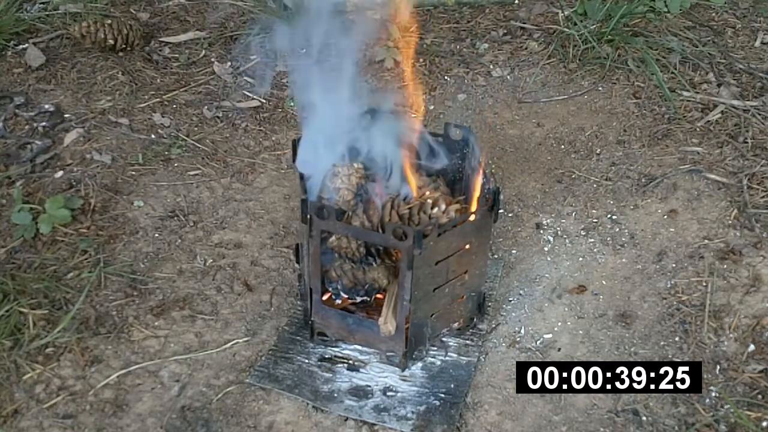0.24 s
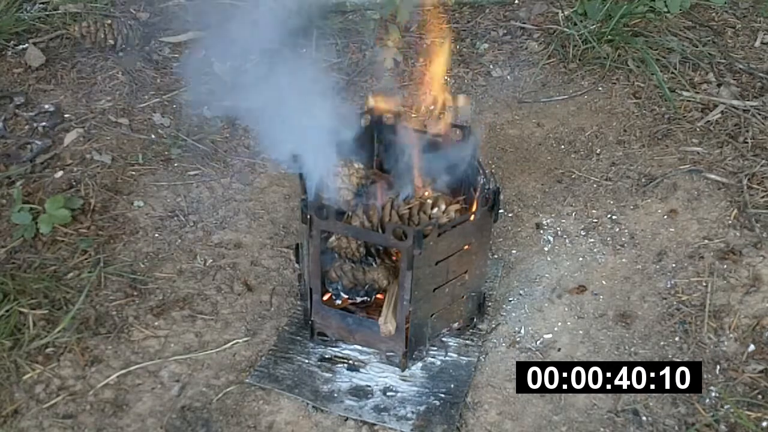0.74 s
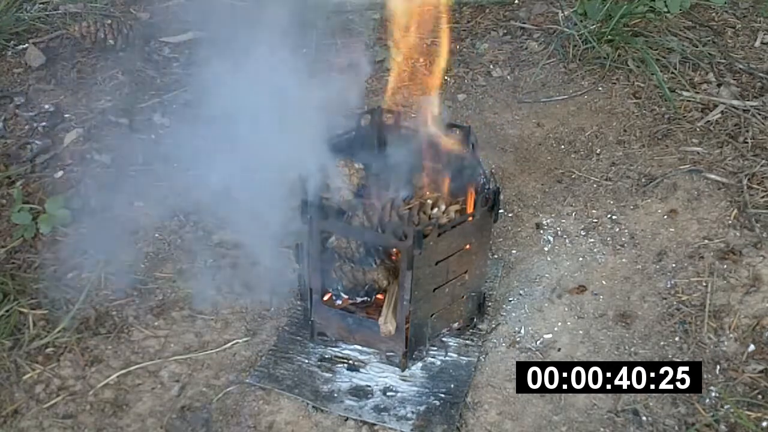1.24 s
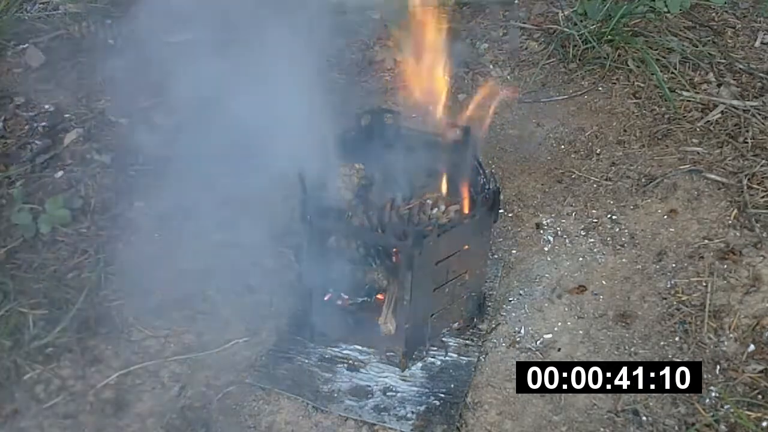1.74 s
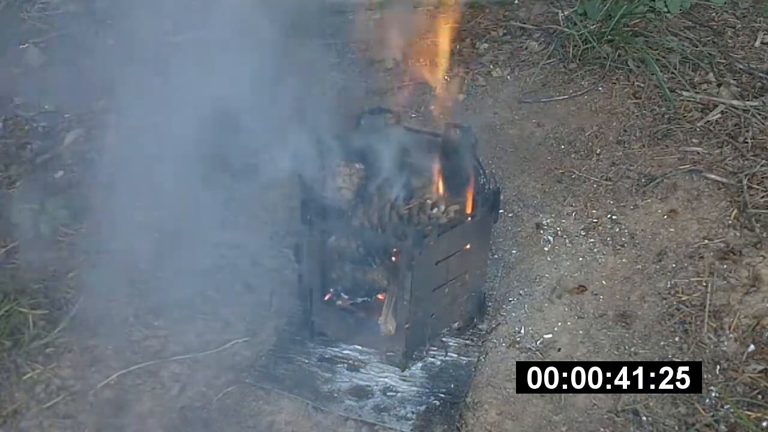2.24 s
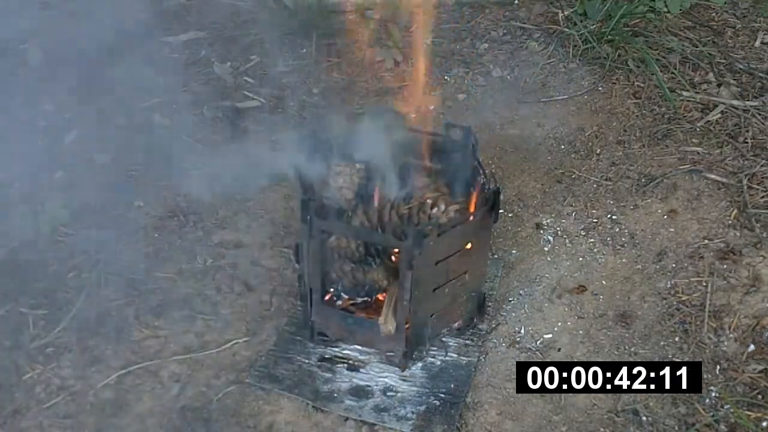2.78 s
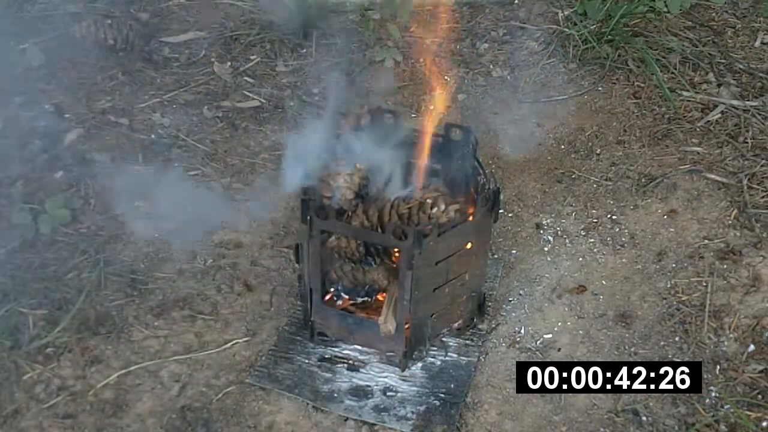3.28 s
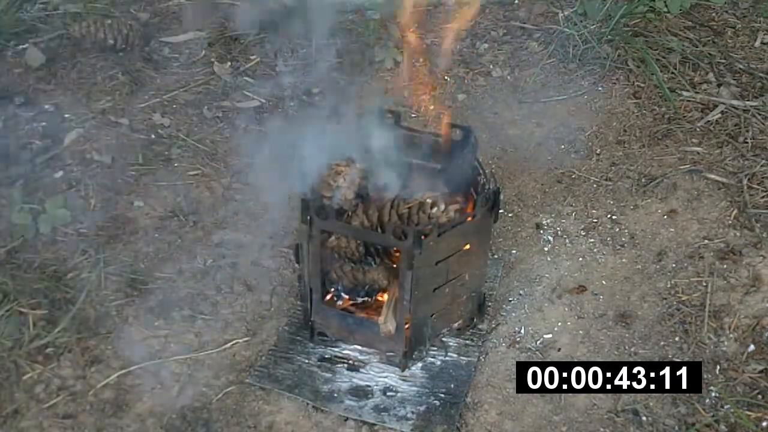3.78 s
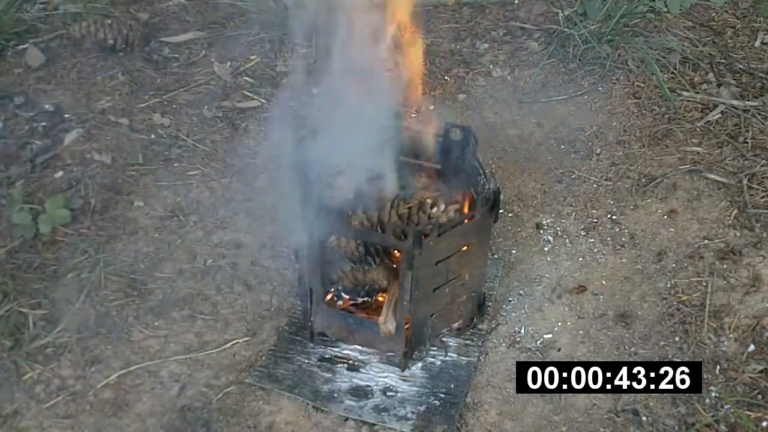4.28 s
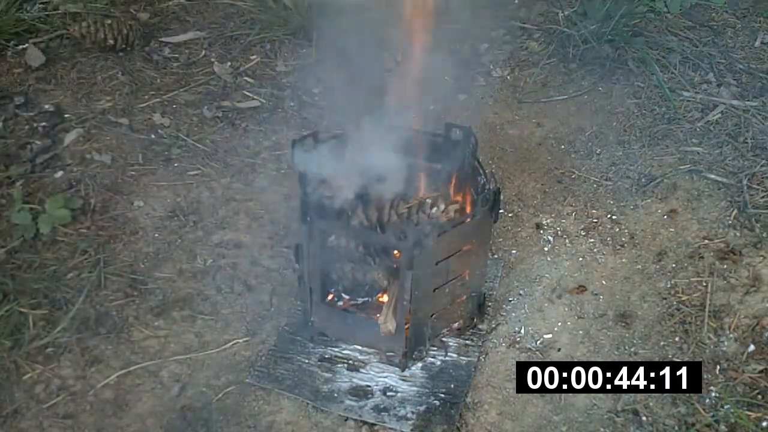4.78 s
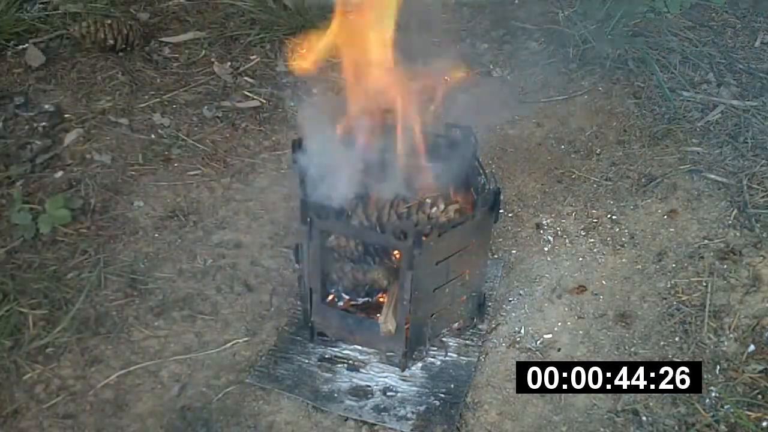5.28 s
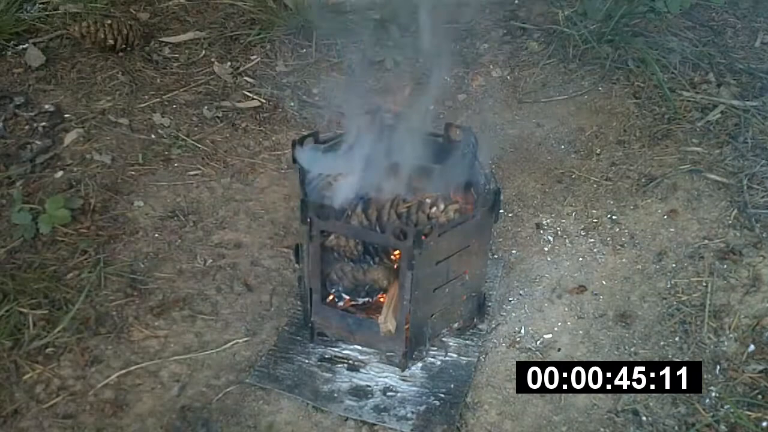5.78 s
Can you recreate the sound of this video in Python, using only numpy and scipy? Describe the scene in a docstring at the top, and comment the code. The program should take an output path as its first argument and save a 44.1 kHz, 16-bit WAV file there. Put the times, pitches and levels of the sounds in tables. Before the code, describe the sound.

A small fire of pine cones and sticks burns in a metal stove outdoors, heard close, dry and in mono. From 0 to 1.3 seconds there is fine, irregular crackle with modest ticks, over soft low flame flutter and faint hiss. Stronger snaps come at 1.4 and 1.5, then a very loud, hard crack at 1.8. Between 2 and 3, small pops cluster among low, blunt puffs of igniting gas. The loudest crack hits at 3.3, followed by a busy patter and another bright, sharp pop at 3.8. Medium cracks follow at 4.2, 4.8 and 4.9; a brief hiss swells near 5. After a sparser moment, a big double snap lands at 5.5. Hiss rises unevenly towards 6 as crackling continues. Tiny far bird chips near 0, 3.5, 3.8 and 4.9, a faint low wavering hum and thin steady high whines stay almost hidden.

```python
"""Dry pops over fine crackle, gas hiss and low flame puffs: pine cones and sticks burn in a small metal stove.
Resin pockets burst as impulses exciting resonances; igniting gas gives pressure humps and rumble; hiss, fizz
and draught are coloured noise of wavering level. Outdoors, a far bird chips in arched sine sweeps and a low
sine hum wavers. The microphone path adds faint whines, four notches and a band limit; above 5 kHz the whole
sound steps down."""
import sys
import numpy as np
from scipy.fft import rfft, irfft, next_fast_len
from scipy.io import wavfile
from scipy.ndimage import uniform_filter1d, map_coordinates

SR = 44100
rng = np.random.default_rng(int(sys.argv[2]) if len(sys.argv) > 2 else 0)


def output_pcm(signal):
    """Save a mono or channel-first signal as 16-bit PCM at the path in sys.argv[1].

    Samples are clipped to [-1, 1] before scaling.
    """
    pcm = np.clip(np.atleast_2d(signal).T, -1, 1) * 32767
    wavfile.write(sys.argv[1], SR, np.round(pcm).astype(np.int16))


N = 265923

# Low hum: t/s, f/Hz, rms level/dB (both waver about these values)
HUM_TRACK = [(0, 90.75, -62), (1, 92, -67.5), (1.5, 93, -63.5), (2.3, 92.2, -67.5), (2.7, 91.4, -58),
             (3.1, 90.2, -69.5), (3.5, 89.9, -76), (6.03, 89.6, -73)]
# Arched bird chips: t of the top/s, top f/Hz, drop at both ends/Hz, length/s, peak level/dB
BIRD_CHIPS = [(0.039, 3990, 900, 0.032, -62), (.255, 3950, 800, 0.025, -68), (3.543, 3760, 300, 0.025, -64),
              (3.77, 3950, 300, 0.022, -63), (4.883, 3850, 304, 0.024, -68)]
# Mean course of the hiss of escaping gas: t/s, rms level/dB
HISS_LEVEL = [(0, -68.5), (1.0, -70), (1.68, -70), (2.2, -70.5), (2.48, -68), (3.1, -72), (3.7, -68),
              (4.1, -70), (4.8, -67.5), (4.98, -59), (5.1, -67), (5.3, -64.5), (5.55, -63.5), (5.65, -64.5),
              (5.8, -58.5), (5.9, -66), (6.03, -56)]
# Spectrum of the hiss: f/Hz, relative level/dB
HISS_SPECTRUM = [(500, -55), (1200, -18), (2000, -10.5), (2800, -10.5), (3600, -2.5), (4800, -2.5),
                 (5300, -3), (6200, -6), (7500, -14), (9500, -26)]
# Spectrum of the fizz: f/Hz, relative level/dB
FIZZ_SPECTRUM = [(5000, -30), (7000, -6.5), (9500, -7.5), (12500, -6), (15000, -5.5), (15250, -13),
                 (15400, -53)]
# Spectrum of the broad roar: f/Hz, relative level/dB
ROAR_SPECTRUM = [(150, -9.5), (400, -2.5), (1000, -6), (2200, -12.5), (3200, -26.5), (4500, -38)]
# Mean course of the flame flutter: t/s, gain/dB
FLUTTER_LEVEL = [(0, -56.5), (.25, -55.5), (.55, -57.5), (.65, -52.5), (.92, -55), (1.3, -55.5), (1.8, -55),
                 (2.7, -54.5), (3.0, -55), (3.2, -57.5), (3.29, -52), (3.65, -55.5), (3.9, -52.5),
                 (4.2, -56), (4.4, -55.5), (4.75, -54), (5.0, -53.5), (5.6, -53), (5.74, -51),
                 (5.89, -53.5), (6.03, -52)]
# Spectrum of the flame rumble: f/Hz, relative level/dB
RUMBLE_SPECTRUM = [(8.8, -41), (15, 4), (38, -1.5), (91, -2.5), (238, -12), (324, -20), (700, -32.5),
                   (910, -61), (1540, -120)]
# Strongest flame puffs: t/s, peak level before the high-pass/dB, width at half height/ms
STRONG_PUFFS = [(.01, -40.5, 7.8), (0.409, -43, 5.3), (.7647, -38.5, 3.2), (0.86, -39, 7.3),
                (.964, -36, 4.6), (1.3009, -44, 4.2), (1.5582, -39, 4.5), (1.571, -42, 3.2),
                (1.6899, -36.5, 2.4), (1.9427, -40, 4.5), (2.0135, -36.5, 4.8), (2.105, -43, 2.7),
                (2.197, -37.5, 7.1), (2.2733, -39, 4), (2.2906, -38.5, 1.8), (2.3632, -42.5, 1.5),
                (2.4668, -35.5, 12), (2.4843, -37.5, 2.7), (2.5577, -44, 3.4), (2.589, -42, 2.5),
                (2.717, -38, 4.2), (2.7738, -44, 3.5), (2.8652, -41, 3.1), (2.914, -37, 2.1),
                (3.2731, -37.5, 3.2), (3.294, -35, 1.9), (3.333, -41, 2.6), (3.4389, -40, 2.1),
                (3.453, -40, 3.5), (3.5477, -37, 1.9), (3.747, -38.5, 4), (3.8034, -43.5, 2.1),
                (3.8285, -39.5, 3.2), (3.8677, -41, 1.6), (3.886, -37.5, 1.8), (4.0598, -38, 1.76),
                (4.251, -39, 2.7), (4.315, -40.5, 1.4), (4.8244, -41, 6.5), (5.068, -35.5, 1.65),
                (5.356, -40.5, 7.3), (5.742, -38, 2.5), (5.7693, -37.5, 2.2)]
# Bursting pockets placed one by one, the loud ones and some small: t/s, snap energy level/dB, snap f/Hz, body
# level re snap/dB, brightness re snap/dB
PLACED_POPS = [(.0398, -37.5, 4120, -21, -7), (.0967, -41, 4270, -14, 3.5), (.1855, -33, 3900, -31, -8),
               (.2161, -44, 4490, -12, -8), (.2586, -38, 4400, -12, -13), (.2846, -42, 4310, -12, -2),
               (.3257, -28, 4300, -11, 4), (.3334, -36, 4420, -18, -13), (.3577, -44, 4210, -10, 5),
               (.4498, -36.5, 4200, -11, -11), (.5375, -23.5, 4000, -12.5, -12), (.5669, -46, 4560, -12, 2.5),
               (.6211, -35.3, 4420, -9, -1), (.637, -33, 4390, -15, -8), (.687, -25, 4000, -14.5, -2.5),
               (.8596, -35, 4480, -20, -12), (.8684, -37, 4300, -17, -8), (.8917, -28.5, 4200, -17, -11),
               (.9008, -35, 4120, -14, -11), (.9976, -37, 4000, -7, -17), (1.0666, -40.5, 4300, -1, -24),
               (1.269, -25.5, 4230, -27, -5), (1.362, -13, 4500, -15, -10.5), (1.481, -33, 4300, -24, -8),
               (1.4947, -33.7, 4540, -14, -15), (1.5062, -9.5, 4150, -16, -5), (1.5108, -39, 3800, 1, -7),
               (1.5733, -26.5, 4200, -12.5, -34), (1.6423, -19, 4340, -16.5, -8.5),
               (1.6744, -32.5, 4506, -18, -6), (1.718, -30.5, 4360, -23, -28), (1.761, -31, 4170, -16, -3),
               (1.781, 3.5, 4360, -16.5, -8), (2.0106, -32, 4360, -26, -2.5), (2.0644, -35, 4030, -13, -5),
               (2.084, -26, 4400, -15, -8.5), (2.1405, -37, 4550, -16, -2), (2.1582, -25.5, 4730, -15, -11),
               (2.1656, -35, 4190, -20, -12), (2.1855, -36, 4360, -15, -4), (2.2684, -29.5, 4070, -15, -16),
               (2.2886, -40, 4230, 2.2, -11), (2.2958, -36.5, 4320, -4, -12), (2.3585, -30, 4430, -21, -14),
               (2.3982, -33, 4460, -22.6, -1), (2.4161, -34, 4060, -9, -3), (2.4224, -40, 4370, -5, -7),
               (2.4511, -36, 4420, -11, 1), (2.5267, -28.5, 4030, -12, -1.5), (2.5657, -37, 4190, -14, -5),
               (2.5924, -29.5, 4480, -19, -8), (2.6131, -28.5, 4550, -17, -5), (2.6362, -27, 4150, -15, -5.5),
               (2.8921, -35, 4224, -20, 3.5), (2.9147, -37, 4200, -17, -8), (2.9595, -35, 4340, -18, -5),
               (2.9807, -19, 4370, -18.5, -14), (3.1288, -31.1, 4070, -11, -14),
               (3.1622, -36.5, 4400, -15, -7), (3.2111, -37.5, 4550, -14, -8), (3.25, -33, 4220, -17, -6),
               (3.2641, -28, 4660, -12, -6), (3.2754, -32, 4530, -19, -6), (3.2953, -18.5, 4710, -17, -9),
               (3.313, 5, 4460, -17.5, -12), (3.3374, -31, 4260, -20, -8), (3.5006, -30.5, 4300, -11, -4),
               (3.5757, -32, 4560, -15, -7), (3.6144, -36.5, 3890, -19, 5), (3.6292, -24.5, 4390, -20, -14),
               (3.6542, -20.5, 4300, -19, -11), (3.659, -32, 4150, -21, -11), (3.6775, -28, 4590, -16, -4),
               (3.7123, -18.5, 4340, -18, -9), (3.7398, -36.5, 4280, -16, -6), (3.8308, -3, 5230, -22, -7),
               (3.9327, -37.5, 4430, -5, -3), (3.9734, -30, 3670, -8.5, -8), (4.0169, -37, 4540, -7, -6),
               (4.0539, -39, 4160, -19, -3), (4.067, -48, 4610, -10, 9), (4.115, -34, 4150, -18, -1),
               (4.1855, -28, 4360, -17, -12), (4.2227, -12, 4190, -7.5, -16), (4.3045, -37, 4730, -8, -23),
               (4.3511, -38.5, 4630, -18, 1), (4.4698, -36.5, 3820, -5, -12), (4.5703, -30, 4300, -10, -9),
               (4.6427, -26.5, 4610, -23, -3.5), (4.7151, -27.5, 4050, -9, -32), (4.7596, -35, 4330, -15, -3),
               (4.7829, -15, 4300, -15.5, -8), (4.7885, -35, 4440, -4, -7), (4.8007, -14.5, 4400, -13, 2.5),
               (4.8263, -28, 4160, -14, -5), (4.866, -38, 4330, -11, 0), (4.937, -12.5, 4240, -13.5, -7.5),
               (4.9633, -39, 4080, -3, 6), (5.0393, -33, 4130, -19, -1), (5.0586, -23.5, 4370, -19, -6),
               (5.3111, -34.5, 4210, -6, -10), (5.3357, -35.5, 4440, -15, -30),
               (5.3568, -31.4, 4450, -16, -2.5), (5.4702, -29.5, 4680, -20, -9), (5.496, 1, 4050, -14, -3),
               (5.5204, -9.7, 4290, -13.5, -1), (5.5302, -33, 4020, -16, -5), (5.5905, -32.5, 4410, -13, -6),
               (5.6254, -21.5, 4360, -20, -7), (5.7112, -37, 4590, -5, -4), (5.7443, -21.5, 4550, -16.5, -7),
               (5.8707, -43, 4140, 3, 6.5), (5.9189, -19, 4530, -15, -18), (5.931, -36, 4540, -9, -3),
               (5.9769, -32, 4100, -22, -3)]
# Lower and upper limits of the random faint crackle, in the same five columns
FAINT_MIN = [0, -52.5, 3895, -17, -21]
FAINT_MAX = [6.5, -41, 4796, -3.5, -7]
# Resonance pairs above the snap (edge, air, top): first f/Hz, width/Hz, second f/Hz, width/Hz,
# level re snap at zero brightness and 0 dB snap/dB, slope with brightness/(dB/dB), slope with snap energy/(dB/dB)
BRIGHT_BANDS = [(6190, 620, 6700, 1740, 3, 0.67, 0.1), (9480, 1550, 9400, 1900, -0.2, 1.13, .01),
                (12570, 1100, 14200, 2900, -7.5, 0.9, -.12)]
# Whines entering the microphone path: f/Hz, rms level before the path filters/dB
PATH_WHINES = [(6054, -82.5), (13965, -82), (14566, -82)]
# Notches of the microphone path: f/Hz, width/Hz
PATH_NOTCHES = [(2715, 480), (5510, 390), (7880, 1720), (10930, 550)]

FIZZ_STEADY_DB, FIZZ_UNDER_HISS_DB = -72, -6.5  # a steady part plus a part that follows the hiss
FAINT_RATE = 42  # faint pops a second
BODY_HZ, BODY_HZ_PER_DB = 2050, 11.5  # body pitch of a 0 dB pop; louder pops ring higher
THUMP_HZ, THUMP_DB = 450, -9  # low thump, level re body
STEP_HZ, TOP_HZ = 5010, 16550  # step down of the whole sound, and upper band limit of the microphone path


def amp(db):
    """Level is logarithmic: 20 dB is a factor of ten in amplitude."""
    return 10 ** (np.asarray(db) / 20)


def unit(x):
    """Scaling by the root mean square gives a signal unit rms."""
    return x / np.sqrt(np.mean(x ** 2) + 1e-20)


def curves(rows):
    """Linear interpolation gives every column after the time one value per sample."""
    s, *columns = np.transpose(rows)
    return [np.interp(np.arange(N) / SR, s, column) for column in columns]


def wobble(rate):
    """Spline interpolation of random knots, rate a second, gives a slow smooth fluctuation."""
    knots = rng.standard_normal(int(N * rate / SR) + 4)
    return map_coordinates(knots, [np.arange(N) * rate / SR])


def filtered(x, response):
    """A linear filter multiplies the spectrum by its complex frequency response."""
    size = next_fast_len(N + SR // 2)
    spectrum = rfft(x, size) * response(np.fft.rfftfreq(size, 1 / SR))
    return irfft(spectrum, size)[..., :N]


def noise(points):
    """White noise shaped by a spectrum on a log-frequency axis becomes coloured noise, here of unit rms."""
    f, db = np.transpose(points)

    def colour(hz):
        return amp(np.interp(np.log(hz + 1), np.log(f + 1), db, -120, -120))

    return unit(filtered(rng.standard_normal(N), colour))


def resonance(f, centre_hz, width_hz):
    """A damped second-order oscillator is a causal band-pass, of gain 1 at its centre."""
    damping = 1j * f * width_hz
    return damping / (centre_hz ** 2 - f * f + damping)


def placed(times, shapes):
    """Superposition: rows of samples add at their times."""
    starts = np.round(np.asarray(times) * SR).astype(int)
    at = starts[:, None] + np.arange(shapes.shape[1])
    return np.bincount(at.ravel(), shapes.ravel(), N + SR)[:N]


def hum():
    """Integrated frequency is phase: a low sine wavers in pitch and level."""
    hz, db = curves(HUM_TRACK)
    phase = 2 * np.pi * np.cumsum(hz + 2.24 * wobble(6)) / SR
    return amp(db + 2.3 * wobble(4.72)) * np.sqrt(2) * np.sin(phase)


def bird():
    """Frequency modulation along a parabola: each whistled chip rises and falls again."""
    s, top_hz, drop_hz, length, db = np.transpose(BIRD_CHIPS)[:, :, None]
    t = np.arange(SR // 20) / SR
    u = np.clip(2 * t / length - 1, -1, 1)  # -1 at the start, 0 at the top, 1 at the end
    arch_hz = top_hz - drop_hz * u * u
    phase = 2 * np.pi * np.cumsum(arch_hz, axis=1) / SR
    chips = amp(db) * (1 - u * u) * np.sin(phase)
    return placed((s - length / 2)[:, 0], chips)


def gas():
    """Turbulent flow is noise: escaping gas hisses and fizzes, and the draught roars more as the flame swells."""
    hiss_db, = curves(HISS_LEVEL)
    flutter_db, = curves(FLUTTER_LEVEL)
    sputter = wobble(28)  # shared by hiss and fizz
    hiss = amp(hiss_db + 1.9 * sputter + 1.5 * wobble(150)) * noise(HISS_SPECTRUM)
    fizz_gain = np.hypot(amp(FIZZ_STEADY_DB), amp(hiss_db + FIZZ_UNDER_HISS_DB))  # powers add
    fizz = fizz_gain * amp(0.56 * sputter) * noise(FIZZ_SPECTRUM)
    swell_db = flutter_db - flutter_db.mean()
    roar_db = -69.5 + 0.64 * swell_db + 2.4 * wobble(30)
    return hiss + fizz + amp(roar_db) * noise(ROAR_SPECTRUM)


def puffs(times, peak_db, width_ms):
    """Pointed one-sided pressure humps; a high-pass drains the pressure away around each."""
    t = np.arange(-600, 600) / SR
    half_widths = np.abs(2000 * t / width_ms[:, None])
    humps = placed(times, amp(peak_db)[:, None] * .5 ** (half_widths ** 1.71))

    def drain(f):
        advance = np.exp(-2j * np.pi * f * t[0])  # puts each peak at its stated time
        return f * f / (f * f + 28 ** 2) * advance

    return filtered(humps, drain)


def flame():
    """Lumps of gas ignite as pressure pulses over a low rumble; positive pressure modulates a broad roar."""
    level_db, = curves(FLUTTER_LEVEL)
    when, width, size = rng.random((int(60 * N / SR), 3)).T  # 60 small lumps a second
    lumps = unit(puffs(when * N / SR, 9 * size, 1.0 + 4.7 * width))
    rumble = amp(-4.5 + 1.6 * wobble(14)) * noise(RUMBLE_SPECTRUM)
    bed = amp(-6.0) * lumps + rumble
    strong = puffs(*np.transpose(STRONG_PUFFS))
    pressure = amp(level_db + 0.91 * wobble(7)) * bed + strong
    roar = amp(-20.0) * np.clip(pressure, 0, None) * noise(ROAR_SPECTRUM)
    return pressure + roar


def pops():
    """Impulse excites resonance: a pocket tears, rattles the stove walls and vents gas; faint ones are random."""
    faint = rng.uniform(FAINT_MIN, FAINT_MAX, size=(FAINT_RATE * N // SR, len(FAINT_MIN)))
    s, db, snap_hz, body_db, bright_db = np.vstack([PLACED_POPS, faint]).T[:, :, None]
    t = np.arange(4096) / SR
    grain = rng.standard_normal((len(s), len(t)))

    # Excitations: each envelope falls 60 dB in the time given in seconds
    tear = grain * 0.16 * amp(-60 * t / .0015)
    tear[:, 0] = np.sign(grain[:, 0])  # the first rupture is the sharpest
    spit_db = 4 * unit(uniform_filter1d(rng.standard_normal(grain.shape), size=130))  # uneven venting
    rattle = amp(-31 - 60 * t / 0.015)
    vent = amp(-52 - 60 * t / 0.15 + spit_db)
    after = grain * (rattle + vent)

    # Resonances, each with its level re snap
    f = np.fft.rfftfreq(len(t), 1 / SR)
    snap = resonance(f, 1.064 * snap_hz, 2000) * resonance(f, snap_hz, 2300) ** 2
    body = resonance(f, BODY_HZ + BODY_HZ_PER_DB * db, 2800) * resonance(f, 610, 5030)
    thump = resonance(f, THUMP_HZ, 710)[None]
    bands = [(snap, 0), (body, body_db), (thump, body_db + THUMP_DB)]
    for a_hz, a_width, b_hz, b_width, base_db, bright_slope, size_slope in BRIGHT_BANDS:
        pair = resonance(f, a_hz, a_width) * resonance(f, b_hz, b_width)
        bands.append((pair, base_db + bright_slope * bright_db + size_slope * db))

    tear, after, burst = rfft(tear), rfft(after), 0
    for band, share_db in bands:
        # the crack gets unit energy; the tail is scaled by the energy of the band's impulse response
        crack = tear * band / np.linalg.norm(irfft(tear * band), axis=-1, keepdims=True)
        tail = after * band / np.linalg.norm(irfft(band), axis=-1, keepdims=True)
        burst = burst + (crack + tail) * amp(db + share_db)
    return placed(s[:, 0], irfft(burst))


def scene():
    """Superposition: the pressures of all sources add in one channel."""
    return (hum() + bird() + gas() + flame() + pops())[None]


def whines():
    """Phase modulation: faint steady tones waver slightly in phase and level."""
    t = np.arange(N) / SR
    total = np.zeros(N)
    for hz, db in PATH_WHINES:
        tone = np.sin(2 * np.pi * (hz * t + 0.08 * wobble(14)))
        total += amp(db + 1.1 * wobble(1.57)) * np.sqrt(2) * tone
    return total


def record(dry):
    """Linear filters in cascade multiply: whines join, then notches, a sharp step down and a band limit act."""
    def path(f):
        notches = np.prod([1 - resonance(f, hz, width_hz) for hz, width_hz in PATH_NOTCHES], axis=0)
        step = amp(-9 / (1 + np.exp(np.clip((STEP_HZ - f) / 7, -50, 50))))  # 9 dB lower above
        roll = amp(-25 * np.clip((f - 15000) / 1500, 0, 2) ** 2)
        return notches * step * roll * (f < TOP_HZ)

    return filtered(dry + whines(), path)


dry = scene()
out = record(dry)
output_pcm(out)
```